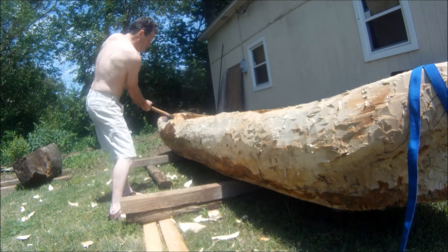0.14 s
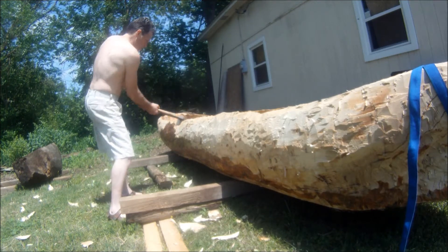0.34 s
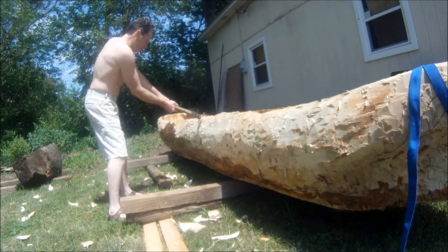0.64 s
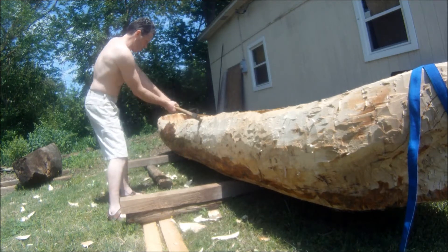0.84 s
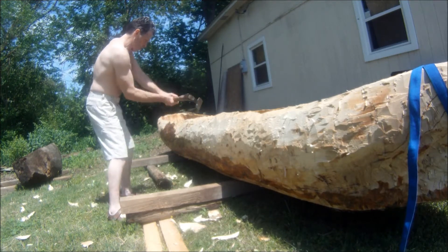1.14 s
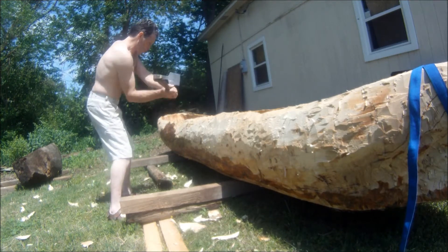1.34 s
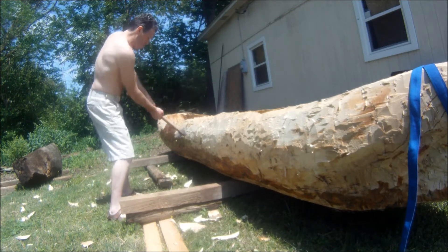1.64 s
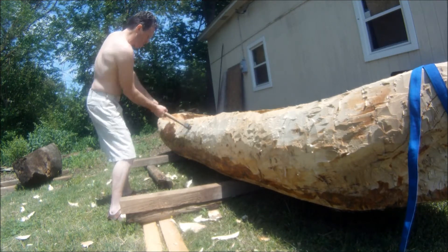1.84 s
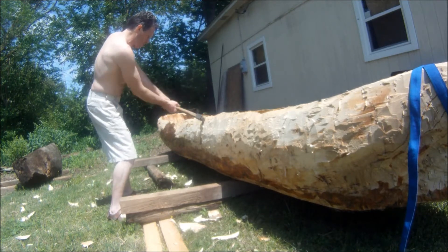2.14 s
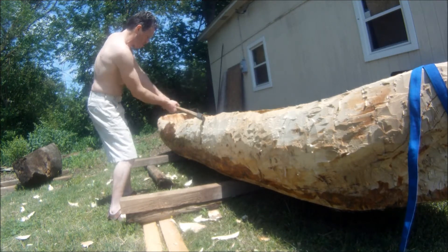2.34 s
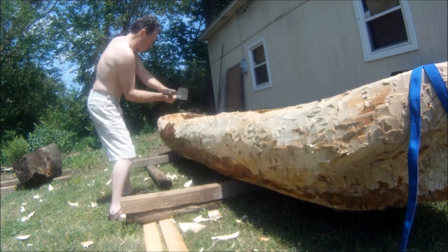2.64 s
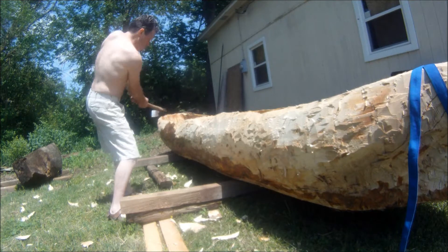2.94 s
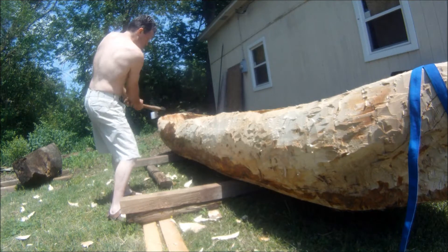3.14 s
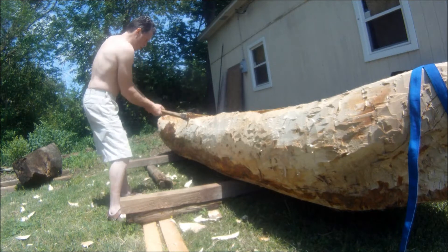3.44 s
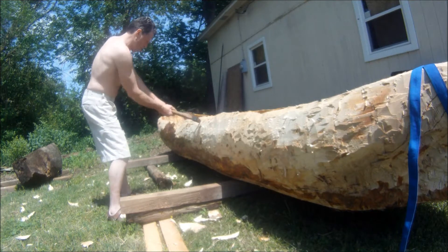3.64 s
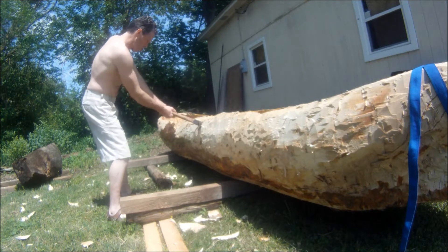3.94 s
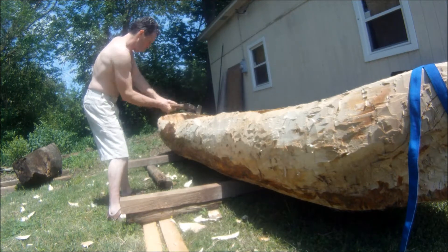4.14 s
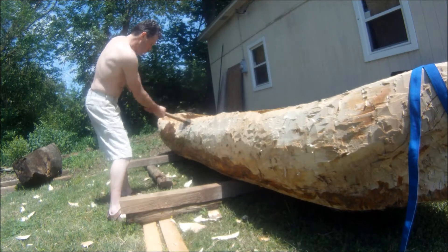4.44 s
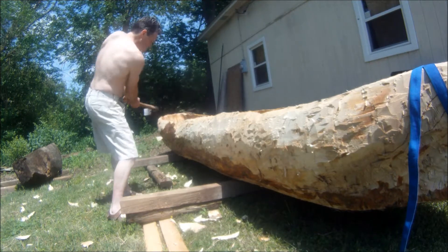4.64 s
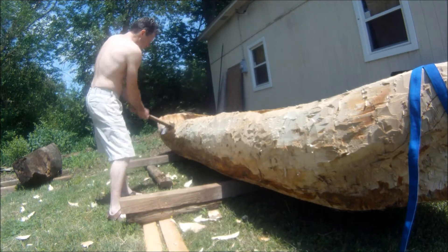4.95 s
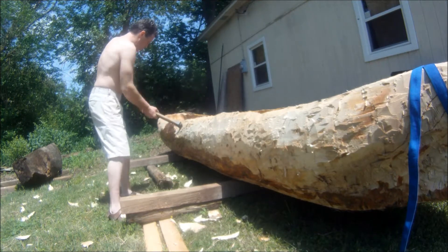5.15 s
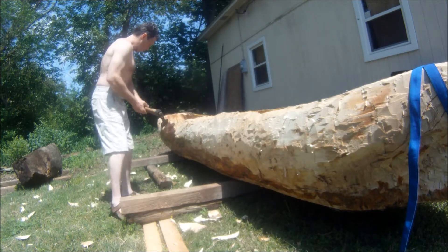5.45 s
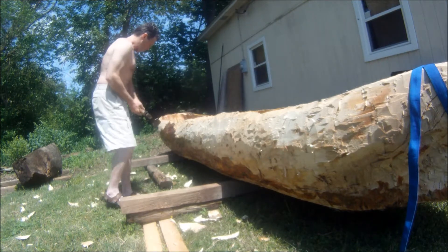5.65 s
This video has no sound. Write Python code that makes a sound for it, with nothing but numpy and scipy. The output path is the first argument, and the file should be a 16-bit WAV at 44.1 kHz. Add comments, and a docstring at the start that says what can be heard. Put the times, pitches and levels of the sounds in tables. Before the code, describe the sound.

Hard chop first, then a weak thud, and so on alternately through seven blows, the last around 4.5 seconds. Hard ones have a deep hollow log boom, a midrange wooden knock and sharp splitting cracks with a slight steel ring. Short echoes come from wall and ground, a soft hiss from trees. Small birds chirp far off above low traffic rumble that grows late. Mono, outdoors, rough camera sound.

```python
"""A man hollows a big log with an adze in a garden, between a shed wall and trees; far traffic rumbles.
A hard chop opens: log modes boom, wall modes knock, and fainter birds soon twitter as short random glides.
Light, dull chops alternate with hard ones; noise bursts crack as chips split and scrape as the blade comes out.
A small bird sings phrases of three falling sine glides; delayed noise tails return the sounds from the garden.
The traffic noise swells late; throughout, a camera holds its 12 kHz samples, which adds a glassy top."""
import sys
import numpy as np
from scipy import signal
from scipy.fft import rfft, irfft
from scipy.io import wavfile

SR = 44100
rng = np.random.default_rng(int(sys.argv[2]) if len(sys.argv) > 2 else 0)


def persist_wave(psi):
    """Save psi, clipped to +-1, as 16-bit WAV."""
    counts = np.round(np.clip(psi, -1, 1) * 32767).astype(np.int16)
    wavfile.write(sys.argv[1], SR, np.atleast_2d(counts).T)


N = 255339
TIME = np.arange(N) / SR


def from_db(db):
    """Level law: decibels to an amplitude gain."""
    return 10 ** (np.asarray(db) / 20)


def rms_one(x):
    """Normalisation: scale a signal to unit rms."""
    return x / np.sqrt(np.mean(x ** 2) + 1e-20)


def in_time(rows):
    """Linear interpolation: each column of a curve at every sample."""
    s, *columns = np.transpose(rows)
    return [np.interp(TIME, s, column) for column in columns]


def add(out, s, sound):
    """Superposition: mix a sound in at a time in seconds."""
    start = max(0, round(s * SR))
    out[start:start + len(sound)] += sound[:N - start]


def band(x, hz, kind, order=2):
    """Frequency selection: causal Butterworth filter."""
    return signal.sosfilt(signal.butter(order, hz, kind, fs=SR, output="sos"), x + 1e-18)


def noise(spectrum):
    """Spectral shaping: steady noise of a given colour, rms 1."""
    hz, db = np.transpose(spectrum)
    f = np.maximum(np.fft.rfftfreq(N, 1 / SR), 1)
    skirts = np.minimum(1, f / hz[0]) ** 2 * np.minimum(1, hz[-1] / f) ** 2
    colour = from_db(np.interp(np.log(f), np.log(hz), db))
    return rms_one(irfft(rfft(rng.standard_normal(N)) * skirts * colour, N))


def ringing(modes, spread_db, shape=np.sin):
    """Modal superposition: decaying modes answer a tap, each tap weighting them anew."""
    hz, db, t60 = np.transpose(modes)[:, :, None]
    t = TIME[:SR // 2]
    strength_db = db + spread_db * rng.standard_normal(db.shape)
    return np.sum(from_db(strength_db - 60 * t / t60) * shape(2 * np.pi * hz * t), axis=0)


def tearing(length, fade_t60, grain_db):
    """Fracture noise: a dense run of uneven snaps lasts a while and then dies."""
    t = TIME[:SR // 10]
    grain = np.repeat(rng.standard_normal(len(t)), repeats=16)[:len(t)]
    snaps = rng.standard_normal(len(t)) * from_db(grain_db * grain)
    run = snaps * from_db(-60 * np.maximum(t - length, 0) / fade_t60)
    # total energy grows with the duration of the run
    energy = (length + fade_t60 / np.log(1e6)) * SR
    return run * np.sqrt(energy / np.sum(run ** 2))


def scatter(x, delay, rise, t60, low_hz, high_hz):
    """Diffuse reflection: an echo from many small surfaces starts late, swells and dies."""
    t = np.maximum(TIME[:SR] - delay, 0)
    echo = band(rng.standard_normal(SR), [low_hz, high_hz], "band")
    swell = (1 - np.exp(-t / rise)) * from_db(-60 * t / t60)
    return signal.fftconvolve(x, echo * swell / np.sqrt(np.sum(swell ** 2)))[:N]


# swell of the far traffic's rumble: t/s, relative level/dB
TRAFFIC_SWELL = [(0.25, -39.5), (2.16, -43), (4.35, -34.5), (4.52, -33), (5.02, -33.5), (5.79, -30.5)]
# spectrum of the traffic's bass: f/Hz, relative spectral level/dB
RUMBLE_COLOUR = [(25, -22.5), (45, -5), (70, -1), (88, 3), (135, -4.5), (200, -9), (280, -17), (450, -34)]
# spectrum of the traffic's mid-range: f/Hz, relative spectral level/dB
WASH_COLOUR = [(180, -7), (320, 0), (500, -4), (800, -11.5), (1300, -18.5), (2200, -24.5), (3500, -37)]


def traffic():
    """Broadband radiation: low noise swells, and a mid-range wash follows part of its swing."""
    rumble_db, = in_time(TRAFFIC_SWELL)
    # -48.5 dB at the mean rumble level, and 0.28 of the swing
    wash_db = -48.5 + 0.28 * (rumble_db - rumble_db.mean())
    rumble = from_db(rumble_db + 2.5) * noise(RUMBLE_COLOUR)
    return rumble + from_db(wash_db) * noise(WASH_COLOUR)


# pitch and strength of the far engine: t/s, f/Hz, relative level/dB
ENGINE_DRONE = [(0, 55.3, -36), (.75, 62.7, -44), (1.25, 58.95, -31), (1.5, 53, -33.5), (1.97, 60, -28),
                (2.5, 47.13, -43.5), (3.3, 49.7, -34), (4.2, 52, -32.5), (5.1, 54.57, -31),
                (5.79, 46.8, -31.5)]


def engine():
    """Phase and amplitude modulation: a low sine drone wavers in both."""
    drone_hz, drone_db = in_time(ENGINE_DRONE)
    waver = noise([(2, -2.5), (6, -4.5), (14, -14.5)])
    wander = 0.5 * noise([(2, -4.0), (10, -13)])   # radians
    drone = np.sin(2 * np.pi * np.cumsum(drone_hz) / SR + wander)
    return from_db(drone_db - 1.5) * drone * (1 + 0.3 * waver)


# strength of the breeze in the leaves: t/s, level before gusts/dB
BREEZE_LEVEL = [(0, -61.5), (1.8, -62.5), (2.4, -65.5), (3.4, -61), (4.3, -67.5), (5.79, -64)]
# spectrum of the leaves' hiss: f/Hz, relative spectral level/dB
LEAF_COLOUR = [(1500, -14), (2800, 0.5), (4000, -1.5), (5600, -1.5)]


def leaves():
    """Random excitation: the breeze draws a faint hiss from the leaves, in small gusts."""
    leaves_db, = in_time(BREEZE_LEVEL)
    gusts = noise([(3, -1), (12, -8.5)])
    return from_db(leaves_db + 0.31 * gusts) * noise(LEAF_COLOUR)


def background():
    """Superposition: traffic, engine and leaves sound independently."""
    return traffic() + engine() + leaves()


def twitter(count=9):
    """Frequency glide: short far notes at random moments bend a little up or down from a random pitch."""
    length_s, level_db, largest_glide = 0.0456, -65, 0.114   # glide as a share of the pitch
    # columns drawn: start in s, pitch in Hz, direction and share of the largest glide
    rows = rng.uniform([0.3, 3300, -1], [1.8, 5030, 1], (count, 3))
    return [(s, length_s, hz, hz * (1 + largest_glide * bend), level_db) for s, hz, bend in rows]


# the near bird's phrases: t/s, level/dB, start f/Hz of the later notes, note length t/s
BIRD_PHRASES = [(1.007, -72, 4170, 0.043), (2.188, -61, 4190, 0.053), (4.037, -55, 3964, .082),
                (5.148, -56, 4800, 0.057)]


def phrases(count=3):
    """Periodic repetition: evenly paced slurs all fall to one pitch."""
    period_s, end_hz = 0.139, 2700
    notes = []
    for s, db, top_hz, length_s in BIRD_PHRASES:
        for k in range(count):
            # the first note starts lower and is softer
            pitch_ratio, softer_db = (1, 0) if k else (0.82, -3)
            notes.append((s + k * period_s, length_s, top_hz * pitch_ratio, end_hz, db + softer_db))
    return notes


def birds():
    """Frequency modulation: each whistle glides fast, then levels off, trembling in pitch and strength."""
    out, tremble = np.zeros(N), noise([(20, -1.5), (120, -7.5)])
    for s, length_s, start_hz, end_hz, db in phrases() + twitter():
        u = np.linspace(0, 1, round(length_s * SR))
        shake = tremble[round(s * SR):][:len(u)]
        glide = end_hz + (start_hz - end_hz) * (1 - u) ** 1.4
        whistle = np.sin(2 * np.pi * np.cumsum(glide * (1 + 0.0067 * shake)) / SR)
        envelope = np.sqrt(4 * u * (1 - u))
        add(out, s, from_db(db + 2 * shake) * envelope * whistle)
    return out


# splitting wood, and faint scrapes as the blade is pulled out (the two near 4.1 s); first of two bursts:
# t/s, relative level/dB, gap to second burst t/s, band reference f/Hz
CRACKS_AND_SCRAPES = [(1.543, -18, 0.0068, 4860), (1.5842, -21.5, 0.00185, 2530),
                      (2.8461, -1.5, .0042, 4300), (2.865, -22.5, 0.0017, 3500), (4.043, -42, .008, 4200),
                      (4.142, -44.5, .009, 4530), (4.4728, -2, .0068, 5400)]
# modes of the steel head: f/Hz, mean relative level/dB, decay t60/s
HEAD_MODES = [(2129, -26.5, 0.022), (2514, -29, .035), (2567, -29.5, 0.03), (3150, -20.5, .048),
              (3120, -38.5, .04), (3870, -39.5, .03), (5150, -27, 0.033), (5080, -26, .045),
              (5400, -24.5, .045), (5520, -25, 0.023)]


def cracks_and_scrapes():
    """Impulsive excitation: splitting wood or the scraping blade gives two bursts that ring the steel head."""
    out = np.zeros(N)
    for s, db, gap_s, hz in CRACKS_AND_SCRAPES:
        edges = [hz * 0.6, hz * 1.3]
        # the second burst is 6.5 dB weaker
        for burst_s, burst_db in (s, db), (s + gap_s, db - 6.5):
            # full strength lasts for 0.39 of the time between the two
            burst = band(tearing(0.39 * gap_s, fade_t60=0.012, grain_db=0.5), edges, "band")
            steel = band(ringing(HEAD_MODES, spread_db=5.0), edges, "band", order=1)
            add(out, burst_s, from_db(burst_db + 4.0) * burst)
            add(out, burst_s, from_db(burst_db + 8.5) * steel)
    return out


def returning_waves(centre_hz, octaves, loss_db, count=3):
    """Dispersion: bending waves travel as the root of frequency, so each far-end return sweeps down."""
    round_trip_s = 0.0085   # to the far end of the log and back, at 1 kHz
    t, out = TIME[1:SR // 8], 0
    for trip in range(1, count + 1):
        hz = 1000 * (trip * round_trip_s / t) ** 2
        strength = np.exp(-(np.log2(hz / centre_hz) / octaves) ** 2) * from_db(-loss_db * (trip - 1))
        out = out + strength * np.sin(2 * np.pi * hz * t)
    return out


# bending modes of the whole log on its bearers: f/Hz, mean relative level/dB, decay t60/s
LOG_MODES = [(96.8, -16.5, 0.17), (113.5, -16.5, .22), (139.6, -15, 0.24), (170.7, -17, 0.41),
             (196.2, -8, 0.1), (224, -13.5, 0.13), (235.5, -20.5, 0.42), (264, -24, 0.33),
             (301, -24.5, 0.073), (320, -32, 0.075), (372, -29.5, .13), (423, -31, 0.099)]


def log_boom(cut_s):
    """Forced vibration: the push of the cut drives the log's bending modes."""
    t = TIME[:SR // 20]
    # the force grows through the cut and drops within a millisecond or two
    release = (1 - np.tanh((t - cut_s) / 0.00072)) / 2
    push = np.minimum(t / cut_s, 1) * release
    boom = signal.fftconvolve(push, ringing(LOG_MODES, spread_db=2.0, shape=np.cos))
    # the camera's microphone picks up little of the thump's deepest bass
    return band(boom, 87, "high", order=4)


# modes of the hollowed wall at pitch ratio 1: f/Hz, mean relative level/dB, decay t60/s
WALL_MODES = [(299.4, -25.5, 0.17), (467, -25, 0.2), (497.4, -22, 0.1), (549, -11.5, 0.044),
              (612, -20.5, 0.044), (680, -26, .04), (820, -11.5, .052), (914, -14, 0.048),
              (1052, -29.5, 0.058), (1280, -31.5, .022), (1690, -24.5, 0.023)]


def wall_knock(pitch):
    """Modal superposition: wall thickness where the blade lands sets the pitch; neighbours swing oppositely."""
    knock = 0
    for k, (hz, db, t60) in enumerate(WALL_MODES):
        knock = knock + (-1) ** k * ringing([(hz * pitch, db, t60)], spread_db=1.5)
    return knock


# blows of the adze: t/s, cut duration t/s, relative thump level/dB, relative knock level/dB,
# relative bite level/dB, wall pitch ratio/1
ADZE_BLOWS = [(.0006, 0.0035, 1.5, 4.5, -6.5, 1.06), (0.7416, 0.0049, -5.5, -9, -34, 1.024),
              (1.5382, 0.0041, 1, -1, -16, 1.07), (2.1716, 0.0061, -9.5, -15.5, -33, 0.9),
              (2.8454, .013, 2.5, 2.5, -15, .98), (3.762, 0.0052, -9, -17, -44, 1.0),
              (4.4722, 0.016, 2, -3.5, -8.5, 1)]


def blows():
    """Impact and release: the blade knocks the wall, pushes the log while it cuts, then lets it spring back."""
    out = np.zeros(N)
    for s, cut_s, thump_db, knock_db, bite_db, pitch in ADZE_BLOWS:
        add(out, s, from_db(thump_db - 37.0) * log_boom(cut_s))
        waves = returning_waves(centre_hz=320, octaves=1.3, loss_db=6.0)
        add(out, s + cut_s, from_db(thump_db - 20.0) * waves)
        knock = wall_knock(pitch)
        add(out, s, from_db(knock_db + 1.0) * knock)
        # the exit knock grows in proportion to the length of the cut
        add(out, s + cut_s, from_db(thump_db - 2.0) * cut_s / 0.027 * knock)
        bite = band(tearing(length=0.0014, fade_t60=0.022, grain_db=4), [800, 2400], "band")
        add(out, s, from_db(bite_db + 9.0) * bite)
    return out


def foliage(x, low_hz, high_hz, delay, rise, t60):
    """Energy scattering: countless leaves turn one band into a smooth late hiss that follows its energy."""
    t = np.maximum(TIME[:SR] - delay, 0)
    swell = ((1 - np.exp(-t / rise)) * from_db(-60 * t / t60)) ** 2
    power = band(x, [low_hz, high_hz], "band") ** 2
    energy = signal.fftconvolve(power, swell / swell.sum())[:N]
    hiss = rms_one(band(rng.standard_normal(N), [low_hz, high_hz], "band"))
    return np.sqrt(np.abs(energy)) * hiss


def garden(x):
    """Reflection: ground and shed wall answer promptly; the trees answer later, mostly with treble."""
    thud = from_db(-13.0) * scatter(x, delay=0.014, rise=0.0036, t60=0.21, low_hz=160, high_hz=354)
    near = from_db(-20.0) * scatter(x, delay=0.007, rise=0.003, t60=0.13, low_hz=1390, high_hz=7000)
    treble = from_db(-22.5) * foliage(x, low_hz=3230, high_hz=6330, delay=0.045, rise=0.015, t60=0.63)
    middle = from_db(-31.5) * foliage(x, low_hz=808, high_hz=2776, delay=0.062, rise=0.02, t60=0.6)
    return x + thud + near + treble + middle


def scene():
    """Superposition: chops with garden echoes and birds with their own, over the background."""
    song = birds()
    echo = scatter(song, delay=0.0091, rise=0.01, t60=0.26, low_hz=2000, high_hz=6910)
    song = song + from_db(-6.0) * echo
    return (background() + song + garden(blows() + cracks_and_scrapes()))[None, :]


def record(dry):
    """Sample and hold: the camera samples slowly, clips overloads and mirrors sound about 6 and 12 kHz."""
    camera_rate, cutoff_hz = 12000, 15400   # samples per second, Hz
    limited = band(dry, 5600, "low", order=14)
    sampled = signal.resample_poly(limited, camera_rate, SR, axis=1, window=("kaiser", 3))
    slow = np.clip(sampled, -1, 1)
    # each sample is held for four steps of a faster clock
    stairs = np.repeat(slow, 4, axis=1)
    held = signal.resample_poly(stairs, SR, 4 * camera_rate, axis=1)[:, :N]
    return signal.sosfilt(signal.ellip(10, 0.1, 70, cutoff_hz, fs=SR, output="sos"), held)


dry = scene()
out = record(dry)
persist_wave(out)
```